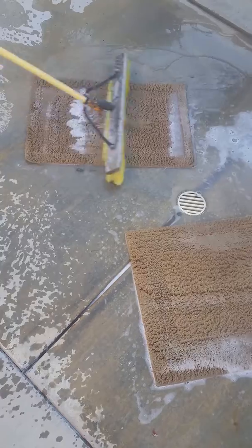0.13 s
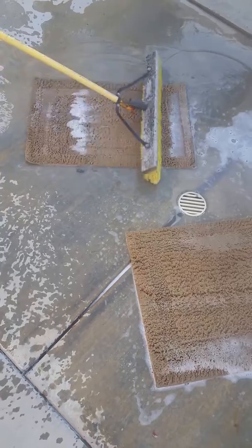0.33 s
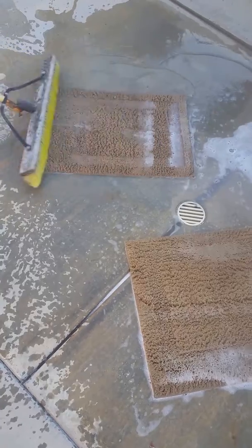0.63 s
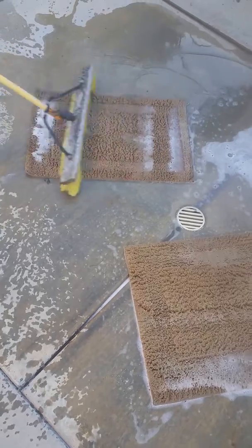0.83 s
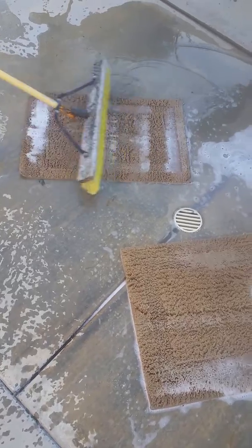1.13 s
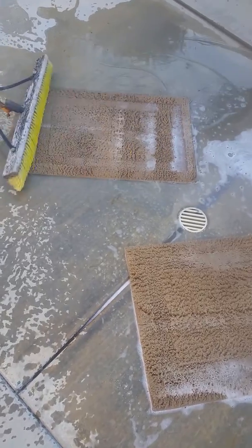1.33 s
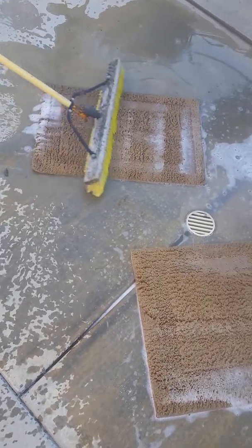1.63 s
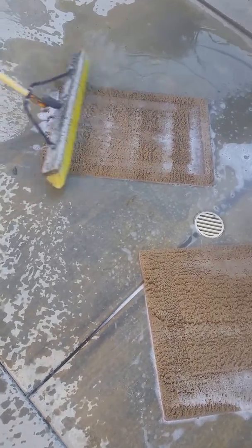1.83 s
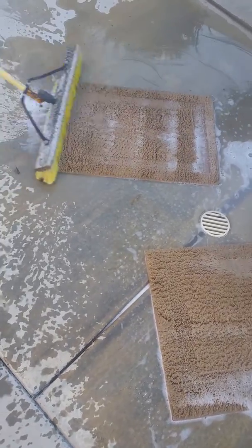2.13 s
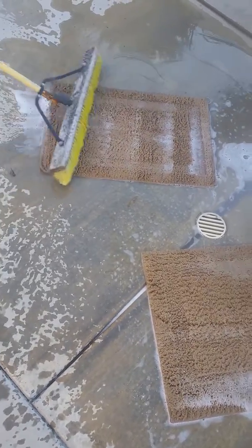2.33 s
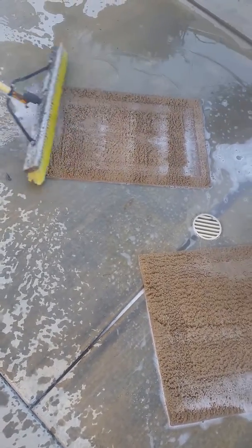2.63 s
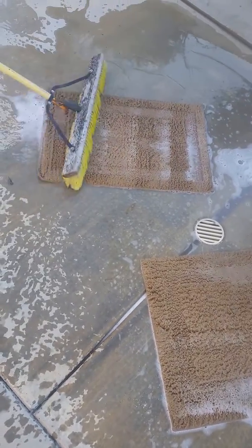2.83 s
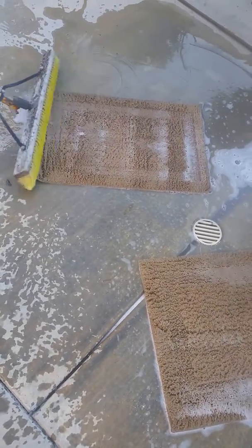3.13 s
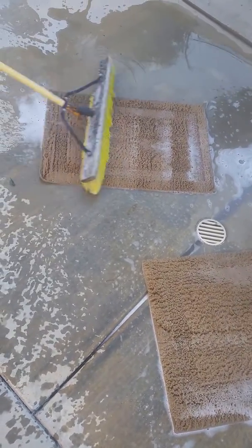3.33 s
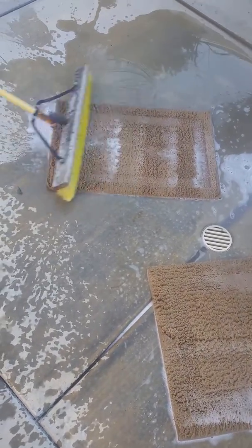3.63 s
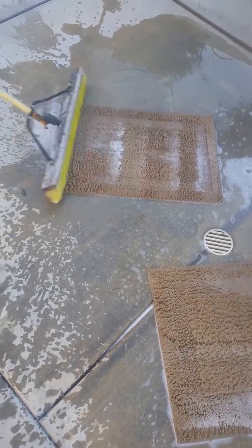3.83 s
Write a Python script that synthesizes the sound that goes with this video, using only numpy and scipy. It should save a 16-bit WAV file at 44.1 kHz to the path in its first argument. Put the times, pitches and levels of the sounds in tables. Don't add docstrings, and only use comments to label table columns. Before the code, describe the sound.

Bristly scrubbing strokes rasp to and fro over a soaked, foamy rug on concrete outside.

```python
import sys
import numpy as np
from scipy import signal
from scipy.fft import rfft, irfft
from scipy.io import wavfile
from scipy.ndimage import uniform_filter1d, minimum_filter1d

SR = 44100
rng = np.random.default_rng(int(sys.argv[2]) if len(sys.argv) > 2 else 0)


def invert_db(level):
    return 10 ** (np.asarray(level, dtype=float) / 20)


def digitize_waveform(pressure):
    field = np.atleast_2d(pressure).T
    bounded = np.clip(field, -1, 1)
    quanta = np.round(bounded * 32767).astype(np.int16)
    wavfile.write(sys.argv[1], SR, quanta)


N = 176400

# (start t/s, rise t/s, fall t/s, flick level/dB, wet pile level/dB)
STROKE_EVENTS = [(.52, .12, 0.12, -25, -36.5), (.68, 0.079, 0.058, -30, -40), (.9, 0.0082, 0.05, -36, -42),
                 (0.888, 0.072, 0.2, -19.5, -30.5), (1.271, 0.1, 0.095, -22, -35.5),
                 (1.483, 0.027, 0.046, -32, -56), (1.535, .025, 0.047, -37, -49),
                 (1.569, 0.068, 0.19, -20, -32), (1.67, 0.031, 0.05, -30, -43),
                 (1.75, 0.032, 0.083, -49, -57), (1.921, 0.088, 0.037, -28, -33.5),
                 (1.991, 0.068, 0.063, -21.5, -37), (2.04, 0.032, 0.048, -31, -34.5),
                 (2.151, 0.084, 0.19, -23.5, -32), (2.25, 0.066, .11, -26, -35.5),
                 (2.39, 0.035, 0.049, -37.5, -49), (2.51, 0.11, 0.052, -26, -34.5),
                 (2.68, 0.051, 0.089, -26.5, -44.5), (2.76, 0.059, 0.11, -20.5, -33.5),
                 (2.83, 0.052, 0.097, -42, -36), (2.962, 0.018, 0.052, -42, -46.5),
                 (3.081, 0.058, 0.063, -28.5, -34.5), (3.159, 0.04, 0.039, -25.5, -43.5),
                 (3.239, 0.016, 0.096, -32.5, -46), (3.309, 0.088, 0.12, -22, -31),
                 (3.4, 0.086, .13, -45, -37), (3.691, 0.096, 0.086, -25, -34),
                 (3.919, 0.099, 0.083, -45, -46)]
# (f/Hz, level/dB)
LEFT_RESPONSE = [(100, -8.5), (700, -7), (3300, -10.5), (5000, -6), (7700, -9), (10500, -10.5),
                 (14000, -3.5), (16000, -9.5)]
FLICK_EXPONENTS, WET_EXPONENTS = (1.6, 2.26), (1.94, 1.2)


def over_hz(points, hz):
    f, v = np.transpose(points)
    return np.interp(np.log(hz + 1), np.log(f + 1), v)


def over_s(points):
    return np.interp(np.arange(N) / SR, *np.transpose(points))


def evened(x):
    return x / np.sqrt(np.mean(x ** 2) + 1e-20)


def colour(x, points, lag_s=0.):
    hz = np.fft.rfftfreq(N, 1 / SR)
    delay = np.exp(-2j * np.pi * hz * lag_s)
    return irfft(rfft(x) * invert_db(over_hz(points, hz)) * delay, N)


def yard():
    # (f/Hz, level/dB per Hz)
    spectrum = [(15, -41), (25, -15.5), (75, 0), (141, -0.5), (408, -18), (700, -16.5), (2300, -23.5),
                (3600, -50)]
    # (f/Hz, correlation)
    likeness = [(30, -0.3), (60, 1), (130, 0.48), (400, 0.63), (1500, -0.13)]
    # (t/s, level/dB)
    swell = [(.37, -6.5), (.6, 0.5), (1.3, 1), (1.8, 0), (2.5, 0.5), (3.2, 2), (3.38, 3), (3.42, -4),
             (3.46, 2), (4, 0.5)]
    hz = np.fft.rfftfreq(N, 1 / SR)
    right, other = rfft(rng.standard_normal((2, N)))
    same = np.clip(over_hz(likeness, hz), -1, 1)
    left = same * right + np.sqrt(1 - same ** 2) * other
    rumble = evened(irfft(np.array([left, right]) * invert_db(over_hz(spectrum, hz)), N))
    rumble = rumble * invert_db(-45.5 + over_s(swell))
    return np.array([colour(rumble[0], LEFT_RESPONSE), rumble[1]])


def gliding_tones(rows):
    t, total = np.arange(N) / SR, np.zeros(N)
    for start, end, start_hz, end_hz, db, width_hz in rows:
        progress = np.clip((t - start) / (end - start), 0, 1)
        waver = evened(uniform_filter1d(rng.standard_normal((2, N)), size=3000, axis=1))
        hz = start_hz + (end_hz - start_hz) * progress + 0.28 * width_hz * waver[0]
        swell = np.sin(np.pi * progress) ** 0.49
        tone = np.sqrt(2) * np.sin(2 * np.pi * np.cumsum(hz) / SR)
        total += invert_db(db + 0.5 * waver[1]) * swell * tone
    return total * invert_db([[-7.], [0]])


def hums():
    # (start t/s, end t/s, start f/Hz, end f/Hz, level/dB, width f/Hz)
    engines = [
        (0.957, 2.8, 151, 162, -43.5, .5),
        (2.45, 3.22, 161, 164, -51.5, 0.68),
        (2.2, 2.62, 102, 119, -45.5, 1.8),
        (1.91, 2.57, 238, 243, -59, 3.8),
        (2.595, 3.35, 84, 100, -51.5, 3.7),
        (3.55, 3.95, 86, 83.6, -52.5, 3.7),
        (3.65, 3.9, 285, 280, -58, 4.24),
        (0.583, 0.73, 168, 160, -48.5, 5.6),
               (3.645, 3.715, 1710, 1750, -58, 8),
        (2.72, 3.28, 127, 138, -45, 3),
        (2.6, 2.9, 568, 572, -64, 6),
    ]
    return gliding_tones(engines)


def gusts():
    # (start t/s, end t/s, start f/Hz, end f/Hz, level/dB, width f/Hz)
    swings = [
        (0.71, .7, 58, 65, -47, 8.4),
        (1.73, 1.87, 75, 57, -39, 8),
        (2.09, 2.15, 75.7, 65, -41, 8),
        (2.17, 2.28, 58, 58, -45, 8),
        (1.48, 1.57, 30, 30, -44, 5),
    ]
    return gliding_tones(swings)


def puffs():
    # (t/s, peak level/dB, width t/s, right minus left level/dB)
    pushes = [
        (0.642, -31, .003, -14),
        (0.657, -30, 0.002, -25),
        (0.701, -35, .002, -20),
        (0.929, -30, 0.00195, -25.5),
        (.992, -20, 0.0017, -26),
        (1.792, -39, 0.0038, 7),
        (1.811, -38, 0.0018, -3),
        (2.1, -39, 0.0023, 8),
        (2.228, -37, 0.0035, -17),
    ]
    t, total = np.arange(N) / SR, np.zeros((2, N))
    for centre_s, db, width_s, right_db in pushes:
        u = (t - centre_s) / width_s
        push = (1 - .5 * u ** 2) * np.exp(-u ** 2 / 2)
        swing_back = 0.34 * np.exp(-(u - 2.6) ** 2 / 2)
        total += invert_db([[db], [db + right_db]]) * (push - swing_back)
    return total


def buffet():
    # (f/Hz, level/dB)
    spectrum = [(20, -0.5), (60, 2.5), (95, 2), (150, -24), (300, -43)]
    # (t/s, level/dB)
    strength = [(.4, -61), (.85, -49), (1.3, -59), (1.8, -43.5), (2.2, -50.5), (2.55, -47), (3.0, -59),
                (3.5, -65), (4, -61)]
    noise, lumps = rng.standard_normal((2, 2, N))
    for _ in range(2):
        lumps = uniform_filter1d(lumps, size=1800, axis=1)
    lumps_db = 2.5 * evened(lumps)
    return evened(colour(noise, spectrum)) * invert_db(over_s(strength) + lumps_db)


def ticks(per_s, spread_db):
    draw = rng.random((3, 3, N))
    snap_db = spread_db * np.minimum(-np.log(draw[0] + 1e-9), 5)
    snaps = invert_db(snap_db) * np.sign(draw[1] - .5)
    return evened(snaps * (draw[2] < per_s / SR))


def speed(strokes, exponents, centre, column):
    t = np.arange(0, N / SR, 1 / 2000)
    power = np.zeros(len(t))
    for row in strokes:
        start, length = row[0], row[1] + row[2]
        rise = row[1] + centre * (length / 2 - row[1])
        up = np.clip((t - start) / rise, 0, 1)
        down = np.clip((start + length - t) / (length - rise), 0, 1)
        arch = np.sin(np.pi / 2 * up) ** exponents[0] * np.sin(np.pi / 2 * down) ** exponents[1]
        power += (invert_db(row[column]) * arch) ** 2
    return np.interp(np.arange(N) / SR, t, np.sqrt(power))


def foam():
    # (f/Hz, level/dB)
    spectrum = [(500, -4.5), (1500, -7), (2300, -2.5), (3500, 5.5), (5200, 0.5), (7000, -1.5), (10000, 1),
                (16000, -3.5)]
    # (t/s, level/dB)
    growth = [(.37, 0), (.8, 2), (1.2, 0), (1.55, 0), (2.45, 0), (3.05, -0.5), (4, 0)]
    return evened(colour(ticks(9000, spread_db=2.0), spectrum)) * invert_db(-44 + over_s(growth))


def head_drag():
    # (start t/s, rise t/s, fall t/s, level/dB)
    pulls = [
        (.57, 0.097, 0.16, -44),
        (.92, 0.1, 0.19, -50),
        (1.3, 0.058, 0.13, -45),
        (2.02, 0.044, 0.078, -48),
        (2.22, 0.089, 0.055, -51),
        (2.58, 0.083, 0.013, -47),
        (3.1, 0.047, 0.039, -48),
        (3.38, 0.068, 0.12, -45.5),
        (3.73, 0.1, 0.061, -47),
    ]
    # (f/Hz, level/dB)
    spectrum = [(400, -30), (750, -2.5), (1100, 3), (1500, 0.5), (2200, -4), (4000, -12.5)]
    friction = evened(colour(ticks(6000, spread_db=5.5), spectrum))
    return friction * speed(pulls, WET_EXPONENTS, 0, column=3)


def wet_pile():
    # (f/Hz, level/dB)
    spectrum = [(300, -31), (700, -14.5), (1200, -10.5), (2200, -8), (3500, 2.5), (5200, 2), (10000, -1),
                (16000, -11.5)]
    hiss = evened(colour(ticks(20000, spread_db=2.0), spectrum))
    return hiss * speed(STROKE_EVENTS, WET_EXPONENTS, 0.44, column=4)


def bristle_flicks():
    # (start t/s, rise t/s, fall t/s, level/dB)
    clumps = [(.905, .006, .02, -36), (1.362, 0.011, .025, -24), (1.497, .01, 0.04, -37),
              (1.59, .01, .025, -34), (1.642, .01, .02, -31), (2.012, .006, .012, -24),
              (2.037, 0.0095, .02, -19), (2.228, .01, .022, -25), (2.31, .012, 0.034, -22),
              (2.42, .006, .015, -42), (2.615, .008, .025, -25), (2.815, 0.0095, 0.027, -32),
              (3.19, .01, .02, -37), (3.32, .006, .018, -35), (3.35, .006, .02, -36),
              (3.388, 0.0061, .02, -29), (3.853, 0.011, 0.018, -32), (3.983, .008, .03, -39)]
    # (f/Hz, level/dB)
    spectrum = [(700, -57), (1500, -15), (3000, -6), (5000, -10.5), (8000, -3.5), (11000, 2), (16000, 4)]
    snaps = evened(colour(ticks(14000, spread_db=2.0), spectrum))
    single = speed(STROKE_EVENTS, FLICK_EXPONENTS, 0, column=3)
    together = speed(clumps, FLICK_EXPONENTS, 0, column=3)
    return snaps * np.hypot(single, together)


def patchy(x):
    z = signal.stft(x, nperseg=256)[2]
    field = rng.standard_normal(z.shape[1:])

    def smoothed(bins, frames_long):
        return evened(uniform_filter1d(uniform_filter1d(field, size=bins, axis=0), size=frames_long, axis=1))

    patch_db, flicker_db = 1.3 * smoothed(5, 14), 1.1 * smoothed(60, 3)
    return signal.istft(z * invert_db(patch_db + flicker_db), nperseg=256)[1][:, :N]


def broom():
    # (t/s, level/dB)
    dryness = [(.5, -13.5), (.78, -5.5), (.93, 0.5), (1.08, -0.5), (1.37, 0), (1.52, 0), (1.65, 1),
               (1.77, -1), (2.04, 1), (2.23, 1), (2.33, -1), (2.62, -0.5), (2.8, -2), (3.15, -0.5),
               (3.4, 0), (3.5, -0.5), (3.75, 0), (3.86, 1.5)]
    # (f/Hz, level/dB)
    fizz = [(10500, -30), (12000, -3), (13000, 0), (16000, 0)]
    # (f/Hz, shared power)
    coherence = [(600, 0.79), (1200, 0.61), (2500, 0.26), (8000, 0.43), (14000, 0.36)]
    # (f/Hz, level/dB)
    right_response = [(5000, 2), (6300, -8.5), (7700, -7), (9200, 7), (10150, 13.5), (11300, 8.5),
                      (12500, 5.5), (16000, 7.5)]
    scrub = head_drag() + invert_db(-3.5) * bristle_flicks() + invert_db(4.0) * wet_pile() + invert_db(-1.0) * foam()
    scrub = scrub + colour(scrub, fizz) * (invert_db(over_s(dryness)) - 1)
    both, left, right = patchy(scrub)
    share = np.clip(over_hz(coherence, np.fft.rfftfreq(N, 1 / SR)), 0, 1)
    common = np.sqrt(share) * rfft(both)
    separate = np.sqrt(1 - share) * rfft(np.array([left, right]))
    ports = irfft(common + separate, N)
    return np.array([colour(ports[0], LEFT_RESPONSE, lag_s=-1.4e-4), colour(ports[1], right_response)])


def scene():
    return yard() + hums() + gusts() + puffs() + buffet() + broom()


def recorder_hiss():
    centre_hz, width_hz = 6700, 910
    hz = np.fft.rfftfreq(N, 1 / SR)
    band = 1 / (1 + ((hz - centre_hz) / width_hz) ** 2)
    return invert_db(-55) * evened(irfft(rfft(rng.standard_normal((2, N))) * band, N))


def dropouts(x):
    # (f/Hz, share)
    losses = [
        [(1500, 0), (2500, .07), (7500, .15), (11000, .07), (16000, .03)],
        [(5000, 0), (5600, .3), (7700, .3), (8300, 0), (16000, 0)],
    ]
    hz, _, z = signal.stft(x, SR, nperseg=2048, noverlap=1024)
    share = np.array([over_hz(points, hz) for points in losses])[:, :, None]
    kept = 1. * (rng.random(z.shape) > share / 30)
    kept = minimum_filter1d(minimum_filter1d(kept, size=10, axis=1), size=3, axis=2)
    return signal.istft(z * kept, SR, nperseg=2048, noverlap=1024)[1][:, :N]


def roll_off(x):
    return signal.sosfilt(signal.butter(12, 15760, fs=SR, output="sos"), x)


def record(dry):
    # (t/s, level/dB)
    fade = [(.36, -13), (.45, -7.5), (.52, -3.5), (.6, 1.5)]
    start_s, opening_s = 0.3657, .015
    gate = np.clip((np.arange(N) / SR - start_s) / opening_s, 0, 1) ** 2
    mix = dropouts(dry + recorder_hiss()) * invert_db(over_s(fade)) * gate
    return roll_off(mix)


dry = scene()
out = record(dry)
digitize_waveform(out)
```